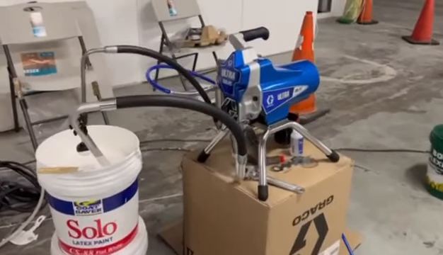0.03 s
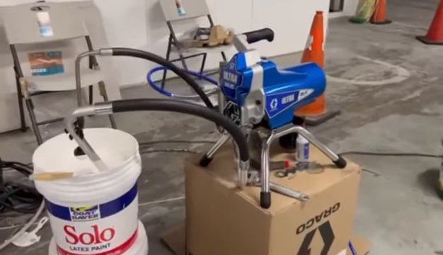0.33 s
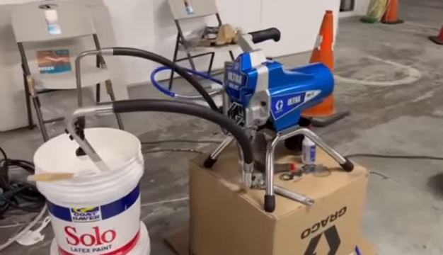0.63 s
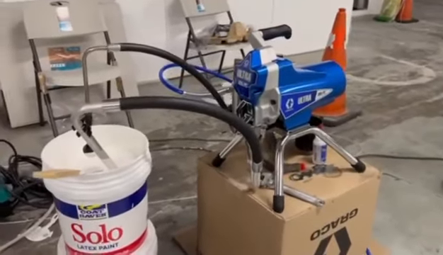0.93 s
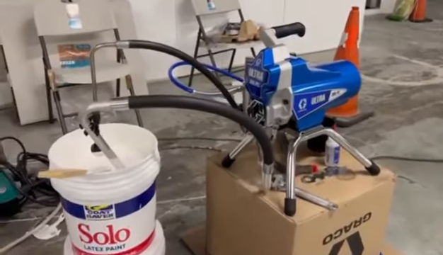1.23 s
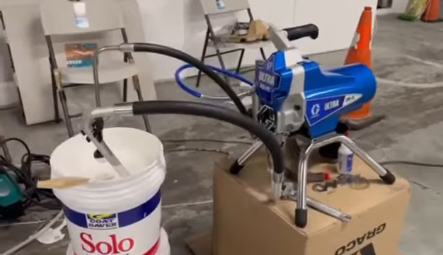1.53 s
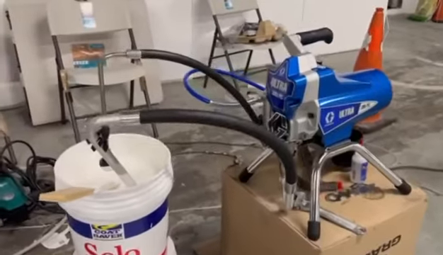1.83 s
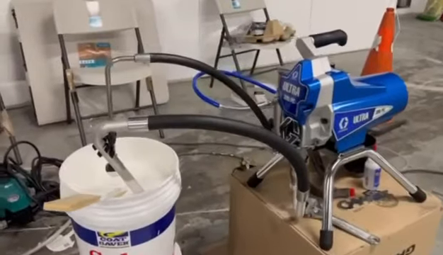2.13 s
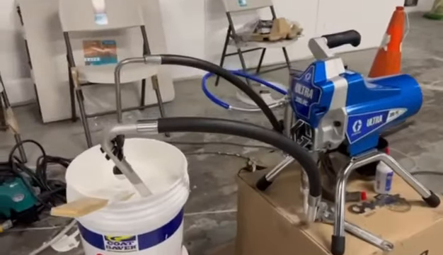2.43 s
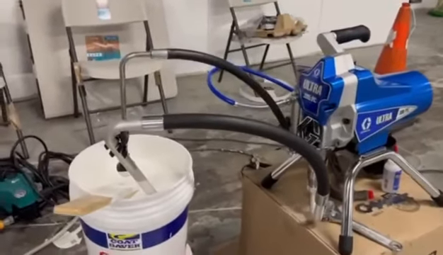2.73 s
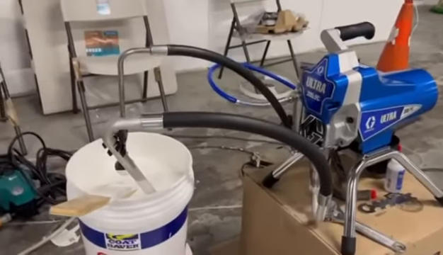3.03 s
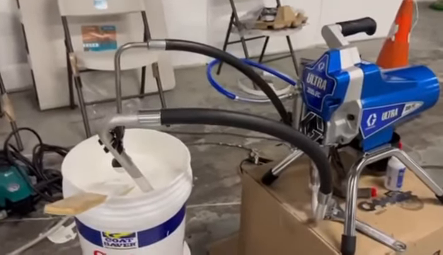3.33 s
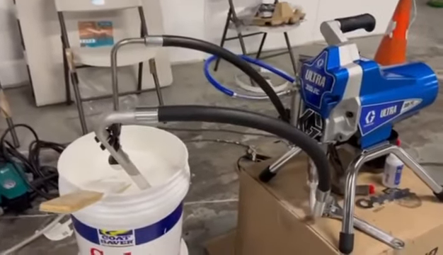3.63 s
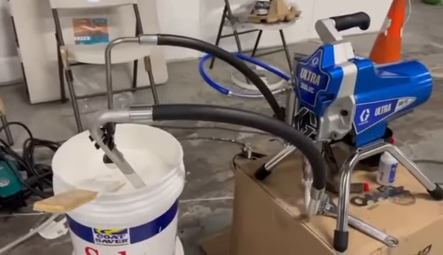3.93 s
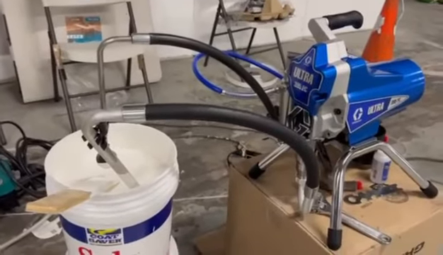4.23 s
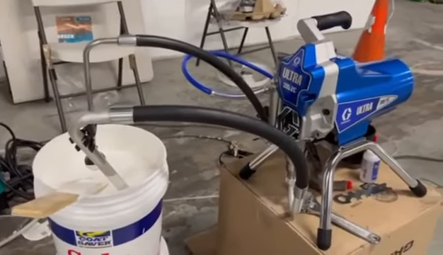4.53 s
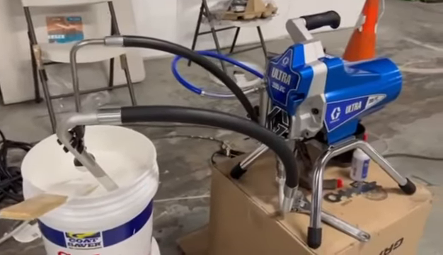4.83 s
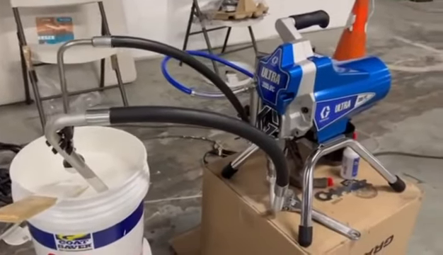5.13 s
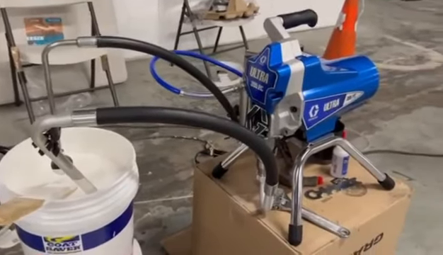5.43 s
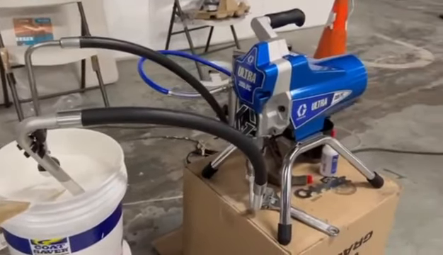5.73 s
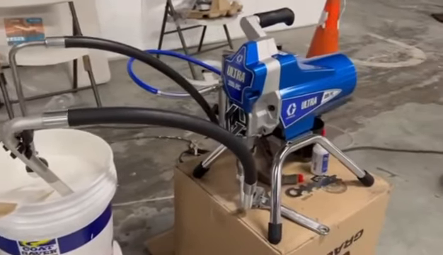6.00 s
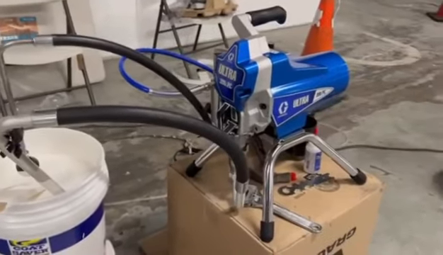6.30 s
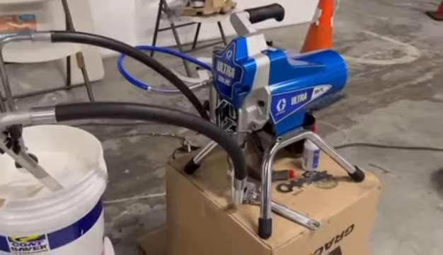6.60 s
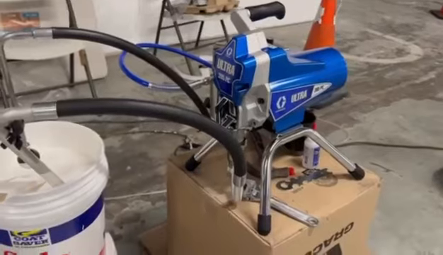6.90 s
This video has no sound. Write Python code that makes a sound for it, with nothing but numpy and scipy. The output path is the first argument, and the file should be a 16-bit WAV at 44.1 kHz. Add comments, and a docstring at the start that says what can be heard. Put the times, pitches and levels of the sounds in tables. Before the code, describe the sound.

An electric paint sprayer pumps close by in a concrete room. Its gears whine and rattle in fast, even pulses, with valve clacks, small hisses and hollow knocks over a low motor hum. After about three seconds there is a short rush of paint, and the pump runs down with a brief shudder. A fan further off keeps droning, quieter, with a wavering tone and soft air noise.

```python
"""First you hear an airless paint sprayer pumping in a concrete room. Its gears whine and sag under each
piston stroke, ball valves clack at every turn, and the motor hums at twice the mains frequency.
After about three seconds comes a last rush of paint, and the pump stops. A fan elsewhere in the room
drones on, a little faster once the pump no longer loads the power supply."""
import sys
import numpy as np
from scipy import signal
from scipy.fft import rfft, irfft
from scipy.io import wavfile
from scipy.ndimage import uniform_filter1d

SR = 44100
rng = np.random.default_rng(int(sys.argv[2]) if len(sys.argv) > 2 else 0)


def wav_out(sig):
    """Save sig, one row per channel (or a flat mono array), as 16-bit PCM at SR to the path in sys.argv[1]."""
    wavfile.write(sys.argv[1], SR, np.round(np.clip(np.atleast_2d(sig).T, -1, 1) * 32767).astype(np.int16))


N = 306936
TIME = np.arange(N) / SR

# the fan's tone swells and fades as the listener moves through standing waves: (time [s], level [dB])
FAN_LEVEL = [(0.0, -29), (0.27, -28.5), (0.52, -44), (1.28, -33), (1.57, -25.5), (1.76, -37), (1.86, -27.5),
             (2.02, -37), (2.5, -26), (2.66, -36.5), (2.95, -23.5), (3.14, -30), (3.31, -23), (3.45, -38),
             (3.49, -25), (3.535, -64), (3.58, -26.5), (3.84, -26.5), (3.9, -24), (4.47, -21.5),
             (5.42, -26), (5.49, -31), (5.76, -26), (6.205, -25), (6.25, -38), (6.34, -43), (6.38, -32.5),
             (6.72, -28.5), (6.96, -26)]
# so does the tone an octave above it: (time [s], level [dB])
OCTAVE_LEVEL = [(0, -35.5), (1.3, -37), (2.38, -32), (2.47, -27.5), (2.56, -35.5), (3.2, -29),
                (3.45, -38.5), (3.68, -31.5), (3.8, -37.5), (4.25, -34), (4.7, -31.5), (4.8, -37),
                (5.58, -40.5), (5.79, -23), (5.94, -38), (6.11, -27), (6.2, -37), (6.28, -34), (6.37, -36),
                (6.49, -29.5), (6.58, -35), (6.81, -32.5), (6.92, -24.5)]
# where the fan's tone sits: (time [s], left minus right [dB])
FAN_PAN = [(0, -3), (3.3, -1), (4.5, 5), (6.96, 3.5)]
# the fan's weaker tones: (multiple of the shaft rate, level [dB])
SHAFT_TONES = [(2, -44), (3, -40), (4, -48.5), (5, -45), (12, -59.5), (18, -60.5), (21, -49.5), (28, -48.5),
               (35, -51)]
# tone colour of the swirling air: (frequency [Hz], relative level [dB])
AIR_SPECTRUM = [(22, -15), (55, 3), (150, -0.5), (300, 1), (450, -1.5), (650, -1), (900, -4.5),
                (1400, -3.5), (2100, -11), (2800, -16), (4000, -19), (6000, -27), (8200, -31.5),
                (9500, -49.5)]
# how alike left and right are, 1 meaning the same: (frequency [Hz], correlation)
AIR_LIKENESS = [(40, 1), (180, 0.98), (400, 0.75), (800, -0.046), (1500, -0.5), (2200, 0.83), (4000, 0.33),
                (8000, 0.11)]
PUMP_LIKENESS = [(60, 0.23), (300, 1), (700, 1), (1150, 0.53), (1500, 0.24), (2000, 1), (3500, 0.79),
                 (7000, 0.84), (9000, -0.89), (11500, -0.78)]
# faint passing tones: (time [s], pitch [Hz], level [dB])
GLIMMERS = [(3.62, 615, -33), (4.07, 904, -37), (5.88, 887, -38), (5.94, 579.5, -30.5), (6.33, 594, -34)]
# a thin band of very high hiss: (frequency [Hz], width [Hz], relative level [dB])
HIGH_HISS_BAND = [(11270, 560, 0)]
# the motor's hum: (multiple of the mains frequency, relative level [dB])
HUM_TONES = [(2, 0), (4, -14.5), (6, -11.5)]
# the stand shakes just after the rush and the power cut: (time [s], strength [dB])
SHUDDERS = [(2.96, -23), (3.23, -26)]
# paint slams into the cylinder early in hard upstrokes: (time [s], thud [dB], hollow ring [dB])
KNOCKS = [(0.325, -20, -34), (0.744, -20.5, -26), (1.036, -19, -28), (1.334, -22, -28), (1.618, -16, -27),
          (1.642, -22, -28), (1.92, -17, -21), (2.214, -17.5, -29), (2.774, -21, -31), (3.089, -19, -25)]
# piston strokes, down and up in turn:
# (time [s], relative clack level [dB], brightness [dB/octave], peak load [dB], tooth rate then [Hz])
STROKES = [(0.006, -22.5, 0, 9.5, 586), (0.144, -19.5, 12, 10, 544.6), (0.301, -19.5, 1, 8, 580),
           (0.444, -15.5, 5, 8, 550.5), (0.594, -19, 13, 10, 581), (0.737, -18.5, 2, 12, 543.6),
           (0.887, -15, 5, 9.5, 574), (1.029, -16.5, 12, 12, 555), (1.18, -22.5, -6.5, 9.5, 572),
           (1.321, -18, 1, 11.5, 546.5), (1.467, -22.5, -1.5, 8.5, 596.5), (1.611, -19.5, 1, 10.5, 553.6),
           (1.759, -14.5, 1.5, 8, 592), (1.899, -16, 2, 9, 538.5), (2.045, -19, -2, 7.5, 578),
           (2.189, -25, 3, 9, 538), (2.336, -17.5, 1, 8.5, 580), (2.476, -21, -3, 11, 544),
           (2.623, -24, -6, 7, 597), (2.764, -14, 3, 7, 545), (2.894, -20, 3, 7.5, 592),
           (3.051, -19, 9, 6, 548)]
# gear tooth tones, with side tones from the shaft: (multiple of the tooth rate, relative level [dB])
GEAR_TONES = [(1, -20), (1.8, 2.5), (2, 11.5), (3.1, 3.5), (3.72, 1.5), (4, 5.5), (5, -2), (6, -13),
              (7, -11), (7.4, -13), (8, -17)]
# tone colours of the pump's noises: (frequency [Hz], relative level [dB])
HISS_SPECTRUM = [(1200, -20), (2200, -1), (2600, 12), (3400, 3.5), (4500, -8.5), (4900, -1.5), (5400, -5.5),
                 (6400, -3.5), (8200, -9), (9500, 12), (11500, -11)]
KNOCK_SPECTRUM = [(80, -16), (220, -2), (330, 10), (540, -8), (740, -3), (950, -1), (1600, -23),
                  (5000, -21), (9000, -37)]
RUSH_SPECTRUM = [(30, -12), (60, 8), (160, 9), (350, 11), (700, 3.5), (2000, 0), (5000, -5.5), (8000, -24),
                 (11000, -57.5)]
RATTLE_SPECTRUM = [(60, -13), (110, 4.5), (260, -4), (520, -5.5), (850, -4), (1100, -1.5), (1400, -3.5),
                   (2100, -6), (2550, -16), (3300, -11), (4550, -12.5), (4950, -6.5), (5300, -15),
                   (8200, -11.5), (9200, -14.5), (11300, -19)]
# pitches at which things ring: (frequency [Hz], width [Hz], relative level [dB])
STAND_RINGS = [(59.3, 8.8, 18.5), (86, 25, -14), (148, 19, -16), (257, 60, -16)]  # stand and box
VALVE_RINGS = [(1915, 190, 5), (2220, 82, -12), (3350, 600, -6), (4080, 70, -3), (4720, 390, -2.5),
               (4936, 41, -2), (6100, 240, -7.5), (6800, 76, -21), (8000, 1700, -24)]  # valves and cylinder
HOUSING_RINGS = [(1096, 160, 1.5), (1193, 70, -3), (1705, 310, 6), (2087, 180, -1), (3820, 1100, 8),
                 (5200, 159, -17)]  # gear housing
GRIT_RINGS = [(1118, 82, -10.5), (1218, 55, 2), (1683, 100, -3.5), (2100, 73, -1.5), (2193, 74, -3)]  # gritty part of the gear rattle

LAST_CLACK = (3.211, -20.5, -0.97)  # like the first three columns of STROKES
POWER_OFF_S, COAST_S, PRESSURE_RISE_S = 3.15, 0.22, 1
MAINS_HZ, LOW_TONE_HZ, SQUEAK_HZ, CYLINDER_HZ = 60.1, 95.9, 2070, 739
FAN_LOADED_HZ, FAN_FREE_HZ = 334.4, 344.7  # blades passing per second, pump on and off
FAN_FREED_S, FAN_SPIN_UP_S = 3.4, .27
LOAD_PEAK_S, LOAD_WIDTH_S = 0.051, 0.027  # timing within each stroke
SAG_START_S, SAG_END_S, SAG_HZ_PER_S = 0.014, .106, 760


def undb(db):
    """Turn decibels into a number to multiply by."""
    return 10 ** (np.asarray(db) / 20)


def unit(x):
    """Scale a sound to an average power of 1."""
    return x / np.sqrt(np.mean(x ** 2))


def over_time(points):
    """Join (time, value) points with straight lines."""
    return np.interp(TIME, *np.transpose(points))


def over_hz(points):
    """Join (frequency, value) points along a musical pitch scale."""
    hz, value = np.transpose(points)
    return np.interp(np.log(np.arange(N // 2 + 1) * SR / N + 1), np.log(hz), value)


def colour(x, spectrum):
    """Turn each frequency of a sound up or down."""
    return irfft(rfft(x) * undb(over_hz(spectrum)), N)


def ring(x, rings):
    """Let a sound ring at the listed pitches."""
    return sum(undb(db) * signal.lfilter(*signal.iirpeak(hz, hz / width, SR), x)
               for hz, width, db in rings)


def wander(rate):
    """A smooth random wobble of size about 1 that changes `rate` times a second."""
    hold = int(SR / rate)
    steps = np.repeat(rng.standard_normal(N // hold + 1), hold)
    return 1.3 * uniform_filter1d(uniform_filter1d(steps, hold), hold)[:N]


def flicker(x, depth_db, rate, count):
    """Split a sound into bands whose levels each waver on their own."""
    spectrum = rfft(x)
    band = np.searchsorted(np.geomspace(200, 8000, count), np.arange(N // 2 + 1) * SR / N)
    return sum(irfft(spectrum * (band == k), N) * undb(depth_db * wander(rate))
               for k in range(count + 1))


def noise_pair(likeness=PUMP_LIKENESS):
    """Left and right noise, more alike at some frequencies than at others."""
    mid, side = rfft(rng.standard_normal((2, N)))
    alike = np.clip(over_hz(likeness), -1, 1)
    return irfft(mid * np.sqrt(1 + alike) + np.array([[1], [-1]]) * side * np.sqrt(1 - alike), N)


def bursts(events, rise_s, decay_s):
    """Loudness shape of blows (time [s], strength [dB]) that rise fast and die away."""
    power = np.zeros(N)
    for s, db in events:
        span = slice(*np.searchsorted(TIME, [s, s + 10 * decay_s]))
        age = TIME[span] - s
        power[span] += (undb(db) * (1 - np.exp(-age / rise_s)) * np.exp(-age / decay_s)) ** 2
    return np.sqrt(power)


def swell(peak_s, width_s):
    """A bell-shaped rise and fall."""
    return np.exp(-np.minimum(((TIME - peak_s) / width_s) ** 2, 20))


def turns(hz):
    """The angle, in radians, of something turning at a changing rate."""
    return 2 * np.pi * (np.cumsum(hz) / SR + rng.random())


def room(x, echo_db, fade_s):
    """Add the echo of concrete walls, which drops 60 dB in fade_s."""
    age = TIME[:SR]
    tail = rng.standard_normal((2, SR)) * undb(-60 * age / fade_s) * (age > .004)
    tail /= np.sqrt(np.sum(tail ** 2, axis=1, keepdims=True))
    return x + undb(echo_db) * signal.fftconvolve(np.atleast_2d(x), tail, axes=1)[:, :N]


def fan():
    """Spinning blades make tones and stir the air; they speed up once the pump is off."""
    loaded = np.exp(-np.maximum(TIME - FAN_FREED_S, 0) / FAN_SPIN_UP_S)
    blade_hz = FAN_FREE_HZ + (FAN_LOADED_HZ - FAN_FREE_HZ) * loaded
    tone_db = over_time(FAN_LEVEL) + 1.7 * wander(22.02)
    pan_db = over_time(FAN_PAN) + 1.3 * wander(13)
    phase = turns(blade_hz * (1 + 0.0042 * wander(24.9)))
    side = np.array([[.5], [-.5]])  # left, right
    tone = undb(tone_db + side * pan_db) * np.sin(phase + side * 0.95)
    octave_db = over_time(OCTAVE_LEVEL) + side * 4.3 + 2.4 * wander(25)
    octave = undb(octave_db) * np.sin(2 * phase + side * 1.63 + 0.95 * wander(32))
    shaft = phase / 7  # seven blades
    # each tone reaches left and right by different paths, which matters more for high ones
    weak_tones = sum(undb(db + 2.5 * wander(9)) * np.sin(k * shaft + .8 * wander(10) + side * .07 * k)
                     for k, db in SHAFT_TONES)
    air = colour(noise_pair(AIR_LIKENESS), AIR_SPECTRUM)
    air = unit(flicker(air, depth_db=1.4, rate=35, count=24))
    return np.sqrt(2) * (tone + octave + weak_tones) + air * undb(-27.5 + side * 0.26)


def glimmers():
    """Short, soft tones rise out of the drone."""
    side_shift = np.array([[.7], [-.7]])
    tones = 0
    for s, hz, db in GLIMMERS:
        phase = turns(hz * (1 + 0.00378 * wander(30)))
        tones += undb(db) * swell(s, width_s=.055) * np.sin(phase + side_shift)
    return np.sqrt(2) * tones


def high_hiss(end_s=3.15):
    """A thin, grainy band of very high hiss near 11 kHz during the first three seconds."""
    fade = np.clip((end_s - TIME) / .05, 0, 1)
    hiss = ring(ring(rng.standard_normal(N), HIGH_HISS_BAND), HIGH_HISS_BAND)
    return fade * unit(hiss * undb(3 * wander(40) + 3 * wander(300))) * undb(-50)


def motor():
    """Rectified (one-way) mains current shakes the motor; a weaker low tone fades beside the hum."""
    hum_db = -24 - 157 * np.maximum(TIME - POWER_OFF_S, 0)
    phase = turns(MAINS_HZ * (1 + 0.0028 * wander(11.32)))
    hum = sum(undb(db + wander(20)) * np.sin(k * phase + 2 * np.pi * rng.random())
              for k, db in HUM_TONES)
    low_db = -6 - 8.9 * TIME + 2 * wander(3.5)
    low_tone = undb(low_db) * np.sin(turns(LOW_TONE_HZ * (1 + 0.014 * wander(7.3))))
    return unit(hum + low_tone) * undb(hum_db)


def shudder():
    """The stand wobbles on its cardboard box with a low rumble."""
    return unit(ring(rng.standard_normal(N), STAND_RINGS)) * bursts(SHUDDERS, rise_s=0.033, decay_s=0.12)


def rod_squeak():
    """The piston rod squeaks late in each downstroke."""
    swells = sum(swell(row[0] + 0.112, width_s=0.017) for row in STROKES[::2])
    loudness = swells * undb(-35.5 + 2 * wander(7))
    phase = turns(SQUEAK_HZ * (1 + .008 * wander(20) + .012 * wander(400)))
    return np.sqrt(2) * loudness * np.sin(phase)


def paint_hiss():
    """Paint hisses through each valve as it opens."""
    hiss = unit(colour(noise_pair() * undb(2 * wander(600)), HISS_SPECTRUM))
    return hiss * bursts([(row[0], -34.5) for row in STROKES], rise_s=0.006, decay_s=0.043)


def paint_knocks():
    """Paint slams into the cylinder with a thud and a hollow ring."""
    s, thud_db, ring_db = np.transpose(KNOCKS)
    thuds = unit(colour(noise_pair(), KNOCK_SPECTRUM))
    thuds *= bursts(zip(s, thud_db), rise_s=0.0018, decay_s=0.012)
    hollow = np.sqrt(2) * np.sin(turns(CYLINDER_HZ * (1 + 0.0503 * wander(250))))
    hollow *= bursts(zip(s, ring_db), rise_s=0.002, decay_s=0.018)
    return room(thuds + hollow, echo_db=-17, fade_s=0.94)


def paint_rush():
    """One long rush of paint comes just before the pump stops."""
    rush = unit(colour(noise_pair(), RUSH_SPECTRUM))
    return rush * bursts([(2.89, -20.5)], rise_s=0.0053, decay_s=0.23)


def valves():
    """Balls chatter shut and ring the cylinder; each clack has its own loudness and brightness."""
    s, clack_db, brightness = np.transpose([row[:3] for row in STROKES] + [LAST_CLACK])
    chatter, clacks = noise_pair(), 0
    for hz, width, db in VALVE_RINGS:
        blow_db = clack_db + brightness * np.log2(hz / 4900)
        blows = bursts(zip(s, blow_db), rise_s=0.0032, decay_s=0.0059)
        clacks += ring(chatter * blows, [(hz, width, db)])
    return room(clacks * undb(11), echo_db=-4.5, fade_s=0.11)


def gear_strain():
    """Each stroke loads the gears and slows them, then they recover: gives tooth rate and load."""
    s, _, _, peak_db, tooth_hz = np.transpose(STROKES)
    sag_s = np.array([SAG_START_S, SAG_END_S])
    corners = s[:, None] + sag_s
    rates = tooth_hz[:, None] - SAG_HZ_PER_S * (sag_s - LOAD_PEAK_S)
    load_db = sum(db * swell(start + LOAD_PEAK_S, LOAD_WIDTH_S) for start, db in zip(s, peak_db))
    return np.interp(TIME, corners.ravel(), rates.ravel()), load_db


def gears():
    """Meeting teeth whine through the housing and rattle, growing grittier as the pressure builds."""
    tooth_hz, load_db = gear_strain()
    slack = np.exp(-TIME / PRESSURE_RISE_S)  # falls to 0 at full paint pressure
    coast = np.clip((TIME - POWER_OFF_S) / COAST_S, 0, 1)  # power off: they run down, loose and rough
    roughness = .022 - .011 * slack + .03 * coast
    phase = turns(tooth_hz * (1 - 0.15 * coast) * (1 + .006 * wander(40) + roughness * wander(350)))
    teeth = sum(undb(db + wander(45)) * np.sin(k * phase + .5 * wander(130)) * (1 + .45 * wander(220))
                for k, db in GEAR_TONES)
    whine = unit(ring(teeth * undb(load_db), HOUSING_RINGS)) * undb(-33.2 + 10 * coast)
    grain = undb(0.14 * load_db + 0.89 * wander(500))
    rattle = flicker(colour(noise_pair() * grain, RATTLE_SPECTRUM), depth_db=2.2, rate=45, count=28)
    rattle = unit(rattle) * undb(-28 - slack - 6 * coast)
    grit = sum(ring(noise_pair() * undb(5 * wander(110)), [row]) for row in GRIT_RINGS)
    grit = unit(grit) * undb(-33.5 - 13 * slack - 6 * coast)
    return (room(whine, echo_db=-9.5, fade_s=0.17) + rattle + grit) * np.sqrt(1 - coast)


def scene():
    """The sprayer close by, the fan further off."""
    pump = gears() + valves() + rod_squeak()
    hiss = high_hiss()
    paint = paint_hiss() + paint_knocks() + paint_rush()
    return pump + hiss + paint + shudder() + motor() + fan() + glimmers()


def record(dry):
    """The phone cuts the treble above 11700 Hz."""
    return signal.sosfilt(signal.ellip(10, .2, 80, 11700, fs=SR, output="sos"), dry)


dry = scene()
out = record(dry)
wav_out(out)
```